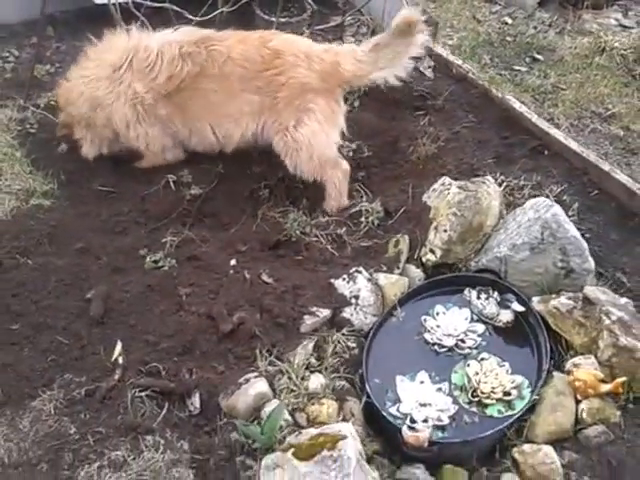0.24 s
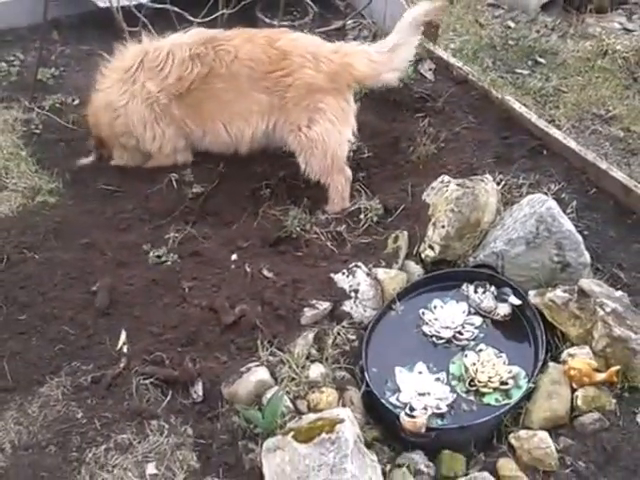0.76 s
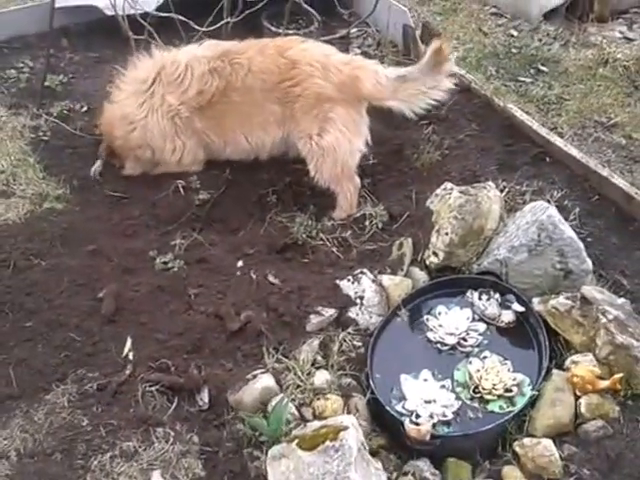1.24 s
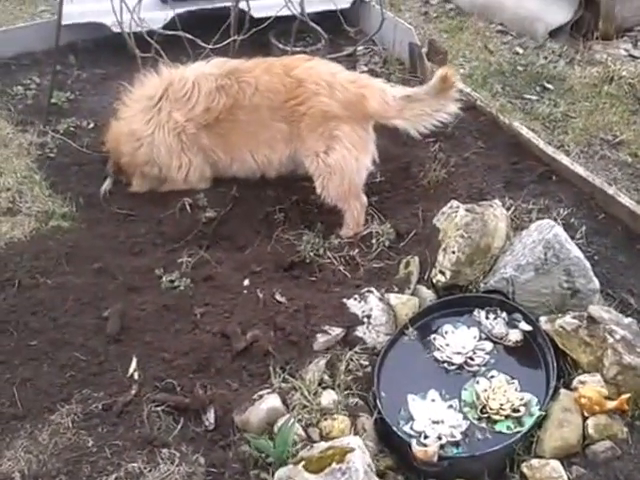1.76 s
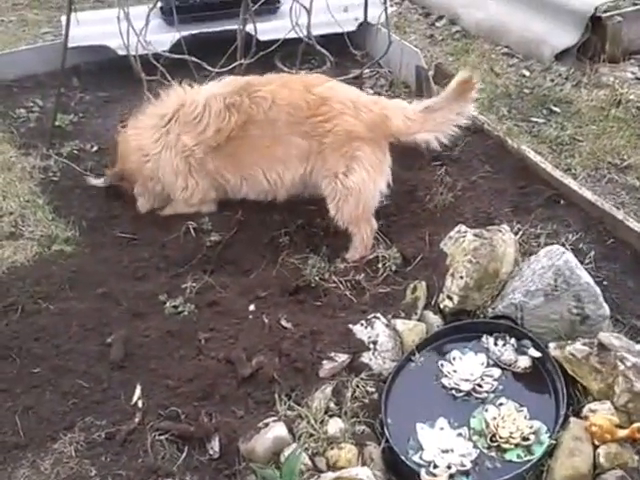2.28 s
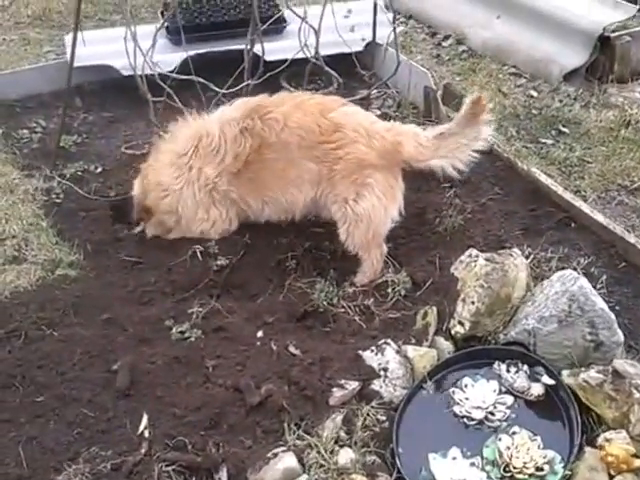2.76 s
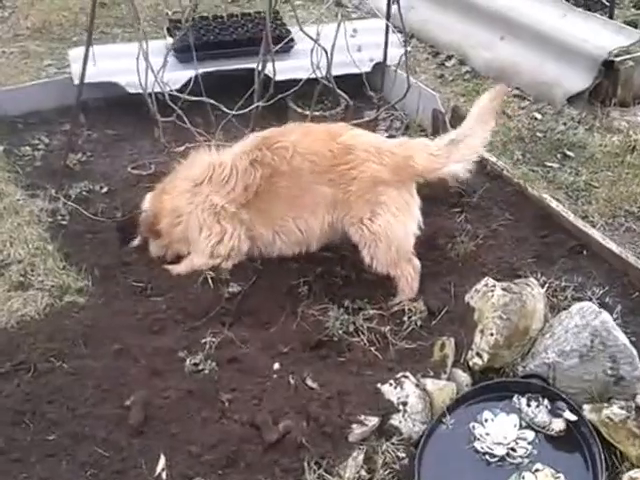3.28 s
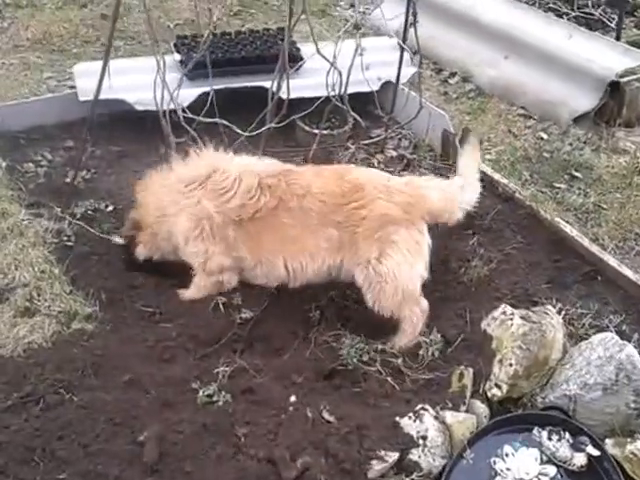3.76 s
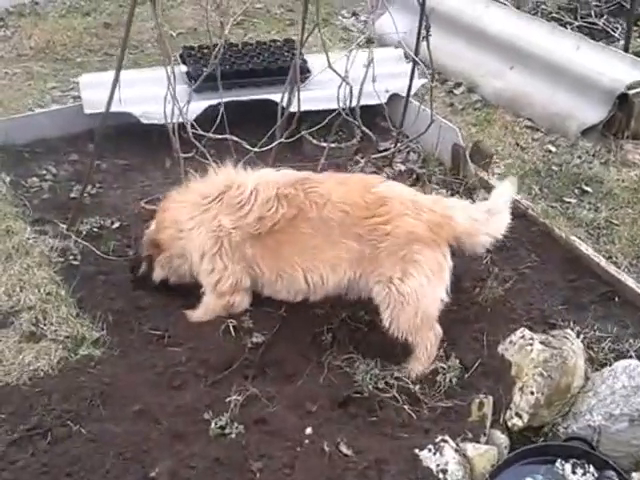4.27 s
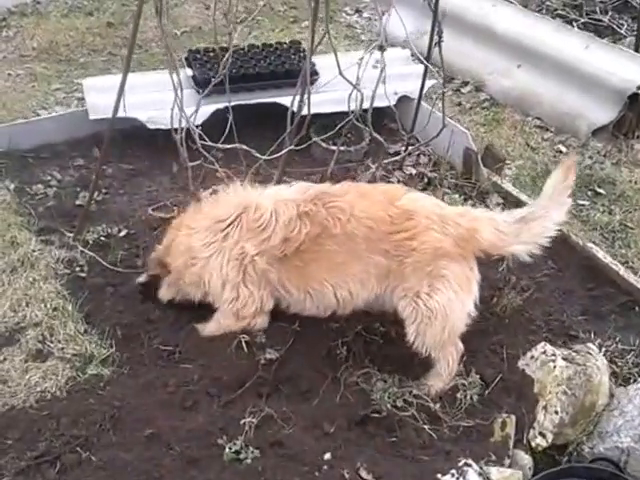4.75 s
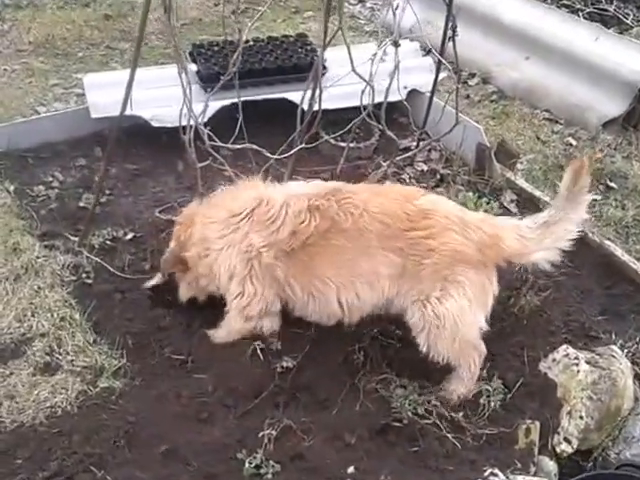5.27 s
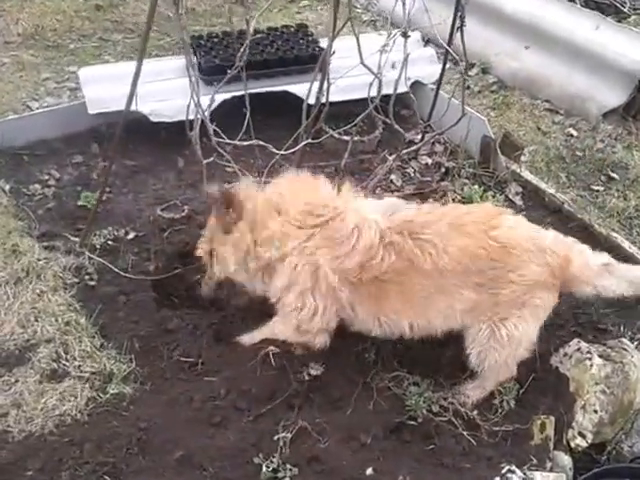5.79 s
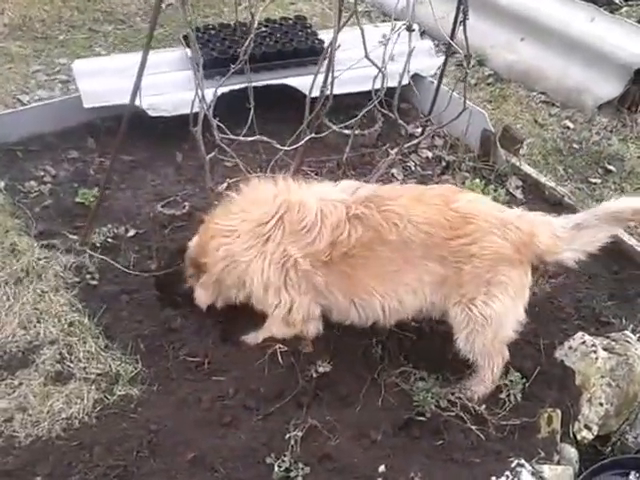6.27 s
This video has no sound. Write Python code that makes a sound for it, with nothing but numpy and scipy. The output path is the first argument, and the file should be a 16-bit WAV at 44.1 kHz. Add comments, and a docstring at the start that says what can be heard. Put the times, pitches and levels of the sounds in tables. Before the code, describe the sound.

Soft scraping and ticking of earth as a dog roots outdoors, with distant birdsong and a single sharp click near the end.

```python
"""Gritty scrapes and a few bird chirps come first: a dog is rooting in loose garden soil.
Paws and muzzle shove and scrape the earth, crumbs and grit tick, and something hard snaps once.
Behind the digging, a songbird whistles a phrase and then a trill across the quiet garden,
and other birds chip in between. The soil is grainy, filtered noise, the snap is a cluster
of damped tones, and the bird notes are gliding sines with echoes from walls and fences."""
import sys
import numpy as np
from scipy import signal
from scipy.fft import rfft, irfft, next_fast_len
from scipy.io import wavfile
from scipy.ndimage import uniform_filter1d

SR = 44100
rng = np.random.default_rng(int(sys.argv[2]) if len(sys.argv) > 2 else 0)


def persist_wave(psi):
    """Save psi, clipped to +-1, as 16-bit WAV."""
    counts = np.round(np.clip(psi, -1, 1) * 32767).astype(np.int16)
    wavfile.write(sys.argv[1], SR, np.atleast_2d(counts).T)


N = 287877
TIME = np.arange(N) / SR

# tone of the quiet garden: (frequency [Hz], relative level [dB])
AIR_SPECTRUM = [(25, -16.5), (50, -10.5), (80, -7.5), (160, -2.5), (300, -5), (520, -1), (900, -3),
                (1400, -2.5), (2200, -17.5), (4000, -16.5), (6300, -10), (8000, -8)]
# slapback from walls and fences: (delay [s], gain [dB])
WALL_ECHOES = [(.016, -23.5), (0.044, -16)]
# single chirps: (time [s], length [s], level [dB], start pitch [Hz], glide [octaves])
CHIRPS = [(0.025, .028, -33, 4710, -0.1), (0.044, 0.015, -41.5, 2970, -0.32),
          (0.184, 0.0229, -50, 2650, -.5), (0.255, 0.027, -42.5, 3750, -0.34),
          (0.338, 0.018, -35.5, 4250, -0.52), (0.396, 0.021, -53, 3640, -0.4),
          (0.464, 0.018, -47.5, 3450, -.35), (1.254, 0.067, -60.5, 1252, 0.048),
          (1.548, 0.018, -43.5, 3470, -0.28), (2.053, 0.035, -42, 3650, -.33),
          (2.659, 0.006, -32.5, 4400, 0.32), (3.474, 0.083, -57, 4900, -0.045),
          (4.606, 0.072, -55.5, 4210, 0.014)]
# a hoarse call, four times: (time [s])
CALL_TIMES = [5.977, 6.1, 6.192, 6.295]
# its two falling voices: (delay [s], length [s], gain [dB], start [Hz], middle [Hz], end [Hz])
CALL_VOICES = [(0, 0.0236, -2.5, 6480, 6440, 5680), (.005, 0.0283, -6.5, 4730, 4320, 4360)]
# a syllable before transposing: (delay [s], length [s], gain [dB], start [Hz], middle [Hz], end [Hz])
SYLLABLE_NOTES = [(0, .009, -4, 4920, 6476, 7330), (.008, 0.017, -8, 5820, 5530, 5430),
                  (0.022, 0.034, -11, 3940, 4670, 5090), (0.043, 0.0073, -9, 5214, 5850, 6200),
                  (0.063, 0.0436, -7.5, 3395, 3460, 3900), (0.081, 0.019, -12, 4680, 4900, 5180)]
# the trill's falling note: (length [s], start [Hz], middle [Hz], end [Hz])
TRILL_NOTE = (.024, 3570, 3080, 2480)
# dull rustle: (time [s], relative level [dB], resonance [Hz])
RUSTLE_CURVE = [(1.5, -81, 1370), (1.534, -70, 1220), (1.774, -49.5, 1440), (1.776, -56.5, 1434),
                (1.996, -53.5, 1139), (2.074, -66, 1350), (2.15, -56, 1147)]
# hollow puffs: (peak time [s], length [s], level [dB], centre [Hz])
SNUFFLES = [(1.985, 0.092, -51, 1130), (2.654, 0.097, -58.5, 281)]
# how hard the dog shoves the earth: (time [s], relative level [dB])
SHOVE_CURVE = [(0, -61), (.24, -53), (.78, -66), (1.2, -68.5), (1.48, -64), (1.75, -56.5), (2.57, -56.5),
               (2.61, -51), (3.15, -57), (3.68, -54.5), (3.92, -65), (3.97, -57.5), (4.42, -54.5),
               (4.56, -59.5), (5.3, -57.5), (5.8, -59.5), (6.05, -61.5), (6.53, -66)]
# tone of sliding earth: (frequency [Hz], relative level [dB])
EARTH_SPECTRUM = [(100, -32), (300, -8.5), (480, -2.5), (800, -4.5), (1200, -7.5), (2400, -3.5),
                  (4300, -0.5), (5200, -5), (6100, 0), (7000, -3), (8000, -4)]
# hollow resonances of the digging: (centre [Hz], width [Hz], gain [dB])
EARTH_RESONANCES = [(524, 89, 6), (1593, 630, 8.5), (3516, 240, 8), (4550, 480, -2)]
# strokes through the soil: (peak time [s], length [s], level [dB], centre [Hz], width [octaves])
SCRAPES = [(0.046, 0.03, -33, 4320, 0.53), (0.062, 0.22, -43.5, 5000, 0.62),
           (0.181, .022, -31.5, 5300, 0.71), (0.206, 0.051, -41, 5000, 0.43),
           (.92, 0.11, -54.5, 4540, 1.23), (1.761, 0.25, -48, 5400, 0.38),
           (2.606, 0.0091, -40.5, 2000, 1.9), (2.645, 0.11, -47, 2600, 1.5),
           (2.701, 0.033, -31, 5900, 0.48), (3.311, 0.045, -39, 5900, 1), (3.596, 0.013, -30.5, 6000, 0.82),
           (3.632, 0.038, -31, 5230, 0.507), (3.838, 0.084, -42.5, 5000, 1.5),
           (4.216, .075, -52, 6000, 0.49), (4.35, 0.85, -65.5, 498, 0.34), (4.371, 0.15, -53.5, 1500, .5),
           (4.747, 0.062, -45.5, 6000, 1.5), (4.861, 0.083, -41.5, 6300, 1.2),
           (4.96, 0.058, -45, 6200, 0.84), (5.238, 0.29, -44, 6430, 0.61),
           (5.288, 0.049, -35.5, 6200, 1.63), (5.517, 0.023, -44.5, 6000, .5),
           (5.775, 0.18, -44, 4800, 1.26), (6.508, 0.25, -50.5, 6300, .5)]
# featured knocks of dull crumbs and bright grit: (time [s], peak level [dB], centre [Hz])
KNOCKS = [(1.153, -38.5, 5830), (1.768, -36.5, 1295), (2.181, -30, 6540), (2.598, -33.5, 2600),
          (2.93, -40.5, 1430), (3.308, -30, 5430), (3.389, -33.5, 1070), (3.389, -32.5, 4510),
          (3.415, -42, 990), (3.444, -31.5, 2500), (3.5, -31, 5045), (3.594, -25, 6350),
          (3.601, -26.5, 2100), (3.994, -43.5, 1080), (4.345, -23, 6200), (4.859, -30.5, 1450),
          (5.13, -25.5, 6000), (5.626, -33, 6080), (5.721, -39.5, 1300), (6.075, -48, 650),
          (6.191, -19, 5860), (6.355, -32, 6400)]
# the cracks within the snap: (time [s], level [dB], tilt [dB/octave])
SNAP_CRACKS = [(5.46805, -17, -1), (5.47002, -12, 0), (5.47116, -24, 1), (5.47198, -28, 2)]
# ring of the snapping body: (frequency [Hz], gain [dB], t60 [s])
SNAP_MODES = [(900, -13, .008), (990, -4, .006), (1360, -4, .011), (1580, -11, .014), (1830, -1, .006),
              (2490, -17, .011), (3380, -5, .006), (4240, -6, .013), (4840, -3, .008), (5200, -10, .008),
              (5490, -3, .01), (6290, -5, .01), (6880, -10, .006)]
# the microphone's treble roll-off: (frequency [Hz], gain [dB])
MIC_ROLLOFF = [(6950, 0.5), (7150, -4.5), (7350, -15.5), (7700, -22), (8100, -29)]


def gain_of(db):
    """Decibels to a gain factor."""
    return 10 ** (np.asarray(db) / 20)


def unit_rms(x):
    """Scales to rms 1."""
    return x / np.sqrt(np.mean(x ** 2) + 1e-20)


def curve_db(points, hz):
    """Reads an EQ curve on a log-frequency axis."""
    f, db = np.transpose(points)
    return np.interp(np.log(hz + 1), np.log(f + 1), db)


def add(mix, s, sound):
    """Mixes a sound in at time s."""
    part = mix[max(round(s * SR), 0):][:len(sound)]
    part += sound[:len(part)]


def equalise(x, gain_at):
    """Filters x by a gain given as a function of frequency."""
    size = next_fast_len(len(x))
    return irfft(rfft(x, size) * gain_at(np.fft.rfftfreq(size, 1 / SR)), size)[:len(x)]


def band(x, hz, octaves, skirt_db=-26):
    """A bell-shaped band around hz, on a low skirt that fades out in the bass."""
    def gain_at(f):
        bell = np.exp(-.5 * (np.log2((f + 1) / hz) / octaves) ** 2)
        return bell + gain_of(skirt_db) * f / (f + hz / 10) * hz / (hz + f)
    return equalise(x, gain_at)


def grit(size, per_s, spread_db, share):
    """A hiss of countless tiny grains; sparse larger ones carry the given share of the power."""
    grains = gain_of(spread_db * np.minimum(rng.exponential(1, size), 4))
    grains *= rng.random(size) < per_s / SR
    crackle = unit_rms(grains * rng.choice([-1, 1], size))
    return np.sqrt(share) * crackle + np.sqrt(1 - share) * rng.standard_normal(size)


def waver(size, samples):
    """Smooth random modulation of rms 1 that changes over about so many samples."""
    return unit_rms(uniform_filter1d(uniform_filter1d(rng.standard_normal(size), samples), samples))


def air(level_db=-61):
    """The background bed: the even hush of the garden."""
    hush = equalise(rng.standard_normal(N), lambda f: gain_of(curve_db(AIR_SPECTRUM, f)))
    return gain_of(level_db) * unit_rms(hush)


def garden_reverb(x, wet_db, t60):
    """Adds a thin tail scattered back by beds, shrubs and sheds."""
    t = np.arange(SR // 2) / SR
    taps = rng.standard_normal(len(t)) * (rng.random(len(t)) < 3000 / SR)
    taps *= 1000 ** (-t / t60) * (t > .004)
    return x + gain_of(wet_db) * signal.fftconvolve(x, taps / np.linalg.norm(taps))[:N]


def wall_echoes(x):
    """Distinct echoes from walls set a sound in the distance."""
    out = x.copy()
    for delay, db in WALL_ECHOES:
        add(out, delay, gain_of(db) * x)
    return out


def whistle(length, glide_hz, crest=0.65, unsteady=0.013):
    """One bird note: a near sine gliding through three pitches, loudest at the fraction crest."""
    progress = np.linspace(0, 1, int(length * SR))
    hz = np.polyval(np.polyfit([0, .5, 1], glide_hz, 2), progress)
    hz *= 1 + unsteady * waver(SR // 4, samples=30)[:len(progress)]
    swell = np.sin(np.pi * np.interp(progress, [0, crest, 1], [0, .5, 1])) ** 0.95
    return swell * np.sin(2 * np.pi * np.cumsum(hz) / SR)


def beats(gap_s, slowing_s, steady, count):
    """A bird's rhythm: even for the first steady notes, then ever slower."""
    k = np.arange(count)
    return gap_s * k + slowing_s * np.maximum(k - steady, 0) ** 2


def chirps(call_db=-43):
    """Scattered chirps, the rougher the further they glide, and a hoarse two-voiced call."""
    out = np.zeros(N)
    for s, length, db, hz, octaves in CHIRPS:
        glide = hz * 2 ** np.linspace(0, octaves, 3)
        add(out, s, gain_of(db) * whistle(length, glide, unsteady=0.0044 + 0.08 * abs(octaves)))
    for s in CALL_TIMES:
        for delay, length, db, *glide in CALL_VOICES:
            add(out, s + delay, gain_of(call_db + db) * whistle(length, glide, unsteady=0.07))
    return out


def song(start_s=1.386, full_db=-36, swell_s=0.18, settle_s=0.487):
    """The songbird repeats one syllable, swelling, slowing and sinking a little in pitch."""
    out = np.zeros(N)
    for t in beats(gap_s=.1425, slowing_s=.00085, steady=0, count=9):
        level_db = full_db - 8 * np.exp(-t / swell_s)
        pitch = 0.96 + 0.0965 * np.exp(-t / settle_s)
        for delay, length, db, *glide in SYLLABLE_NOTES:
            s = start_s + t + delay
            glide_hz = pitch * (1 + .01 * rng.standard_normal()) * np.array(glide)
            note = gain_of(level_db + db + 2.5 * rng.standard_normal()) * whistle(length, glide_hz)
            add(out, s, note)
            # a close reflection beats with the glide
            add(out, s + rng.uniform(0.0024, 0.0063), gain_of(-5) * note)
    return out


def trill(start_s=3.2085, full_db=-34.5, swell_s=0.11, fade_db_per_s=5):
    """About sixteen falling notes a second; the run swells quickly, then fades and slows."""
    out = np.zeros(N)
    length, *glide = TRILL_NOTE
    for t in beats(gap_s=.0603, slowing_s=.0004, steady=7, count=18):
        s, fade_db = start_s + t, fade_db_per_s * t
        detune, accent, bounce = rng.standard_normal(3)
        db = full_db - 14.5 * np.exp(-t / swell_s) - fade_db + 2.8 * accent
        note = whistle(length, np.array(glide) * (1 + .015 * detune), crest=0.18, unsteady=0.015)
        note *= gain_of(np.linspace(2, -8, len(note)))  # fades as it falls
        add(out, s, gain_of(db) * note)
        reflection_s = 0.0099 * rng.uniform(0.58, 1.0)
        add(out, s + reflection_s, gain_of(db - 9 + 4 * bounce) * note)
        add(out, s + .039, gain_of(-45 - fade_db) * note)  # a ghost note between the strong ones
    return out


def birds():
    """The distant bird layer: each part has its own reverb, and the song takes the echoes twice."""
    voices = garden_reverb(wall_echoes(song()), wet_db=-8.5, t60=0.14)
    voices += garden_reverb(trill(), wet_db=-11.5, t60=0.29)
    voices += garden_reverb(chirps(), wet_db=-4.5, t60=0.35)
    return wall_echoes(voices)


def rustle(width_hz=330):
    """A soft, dull rustle with a drifting resonance."""
    s, db, hz = np.transpose(RUSTLE_CURVE)
    grains = grit(N, per_s=1400, spread_db=4.5, share=0.16)
    body = unit_rms(band(grains, hz=1125, octaves=0.51))
    # shift down, low-pass, shift back: a moving band-pass
    carrier = np.exp(2j * np.pi * np.cumsum(np.interp(TIME, s, hz)) / SR)
    pole = np.exp(-np.pi * width_hz / SR)
    ring = (carrier * signal.lfilter([1 - pole], [1, -pole], body / carrier)).real
    envelope = gain_of(np.interp(TIME, s, db, left=-120, right=-120))
    return envelope * (gain_of(-4) * body + gain_of(-8) * unit_rms(ring))


def stroke(t, length, attack_share=0.46):
    """An envelope: a rounded swell up to t = 0, then a steady decay."""
    attack_s, decay_s = attack_share * length, (1 - attack_share) * length
    return np.exp(-(np.minimum(t, 0) / attack_s) ** 2 - np.maximum(t, 0) / decay_s)


def snuffles():
    """Soft puffs of air with one narrow resonance, like a dog snuffling."""
    out, t = np.zeros(N), np.arange(SR) / SR - .5
    for s, length, db, hz in SNUFFLES:
        puff = unit_rms(band(rng.standard_normal(SR), hz, octaves=.09, skirt_db=-36))
        add(out, s + t[0], gain_of(db) * stroke(t, length) * puff)
    return out


def shove_db(s):
    """The strength of the shoving at time s."""
    return np.interp(s, *np.transpose(SHOVE_CURVE))


def hollow_db(hz):
    """The resonant EQ that makes the digging sound hollow."""
    return sum(db / (1 + (2 * (hz - centre) / width) ** 2) for centre, width, db in EARTH_RESONANCES)


def shoving(gain_db=6.0, lumpy_db=1.48):
    """Pushed by paws and muzzle, loose earth slides in a fine, hollow-sounding stream."""
    grains = grit(N, per_s=3500, spread_db=3.5, share=0.34)
    stream = unit_rms(equalise(grains, lambda f: gain_of(curve_db(EARTH_SPECTRUM, f) + hollow_db(f))))
    return stream * gain_of(gain_db + shove_db(TIME) + lumpy_db * waver(N, samples=700))


def ticks(crumbs_per_s=6.6, low_hz=1200, high_hz=7000, t60_cycles=19.4, size=4096):
    """Falling crumbs and bits of grit: dead knocks, the shorter the higher they sound."""
    out, t = np.zeros(N), (np.arange(size) - size // 8) / SR
    knocks = list(KNOCKS)
    for s in TIME[rng.random(N) < crumbs_per_s / SR]:
        db = shove_db(s) + 9.5 + 3.5 * rng.standard_normal()  # follows the shove that throws the crumb
        knocks.append((s, db, low_hz * (high_hz / low_hz) ** rng.random()))
    for s, db, hz in knocks:
        burst = rng.standard_normal(size) * (t >= 0) * 1000 ** (-abs(t) * hz / t60_cycles)
        knock = band(burst, hz, octaves=0.43)
        add(out, s + t[0], gain_of(db) * knock / abs(knock).max())
    return out


def snap(size=3000):
    """A few cracks within four milliseconds ring one small, hard, well damped body."""
    out, t = np.zeros(N), np.arange(size) / SR
    for s, level_db, tilt_db in SNAP_CRACKS:
        for k, (hz, db, t60) in enumerate(SNAP_MODES):
            strength = (-1) ** k * gain_of(level_db + db + tilt_db * np.log2(hz / 3000))
            add(out, s, strength * 1000 ** (-t / t60) * np.sin(2 * np.pi * hz * t))
    return signal.sosfilt(signal.butter(3, 480, "high", fs=SR, output="sos"), out)


def scrapes(hollowness=0.47, patchy_db=3.55):
    """Each stroke swells as it bites into the soil and dies as the crumbs settle."""
    out = np.zeros(N + SR)
    t, f = np.arange(SR) / SR - .5, np.fft.rfftfreq(SR, 1 / SR)
    for s, length, db, hz, octaves in SCRAPES:
        grains = grit(SR, per_s=1700, spread_db=4.0, share=0.31)
        crumbs = band(grains, hz, octaves, skirt_db=-17.5)
        # every clod has its own colour
        colour_db = hollowness * hollow_db(f) + patchy_db * waver(len(f), samples=150)
        clod = unit_rms(irfft(rfft(crumbs) * gain_of(colour_db), SR))
        add(out, s, gain_of(db) * stroke(t, length) * clod)
    return out[SR // 2:][:N]  # trim the pre-roll so each peak lands on its cue


def scene():
    """Garden, birds and digging reach one microphone, so both channels are alike."""
    impacts = garden_reverb(snap() + ticks(), wet_db=-16.0, t60=0.46)
    mono = air() + shoving() + rustle() + scrapes() + snuffles() + impacts + birds()
    return np.array([mono, mono])


def record(dry, cutoff_hz=8200):
    """A narrow-band recorder: the treble rolls off steeply above 7 kHz."""
    dull = np.array([equalise(side, lambda f: gain_of(curve_db(MIC_ROLLOFF, f))) for side in dry])
    lowpass = signal.firwin(401, cutoff_hz, window=("kaiser", 8), fs=SR)
    return signal.oaconvolve(dull, lowpass[None], "same")


dry = scene()
out = record(dry)
persist_wave(out)
```